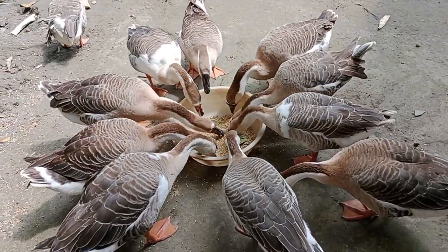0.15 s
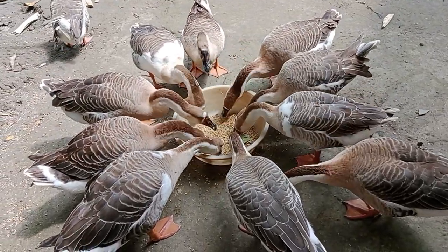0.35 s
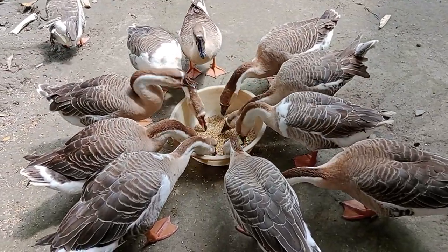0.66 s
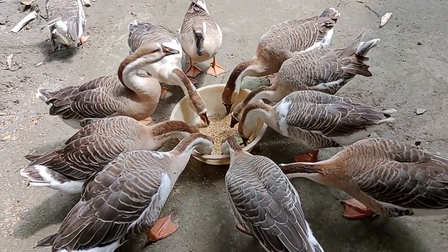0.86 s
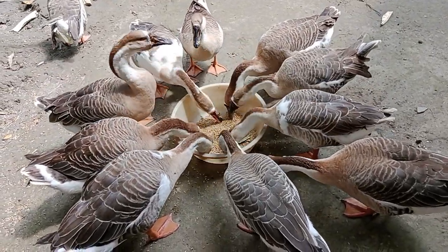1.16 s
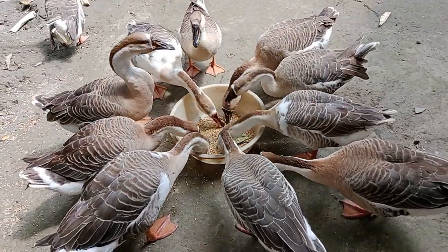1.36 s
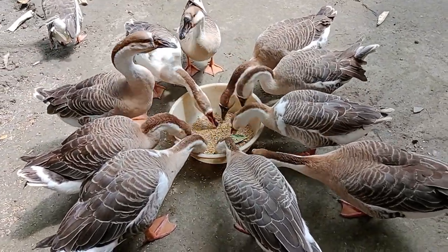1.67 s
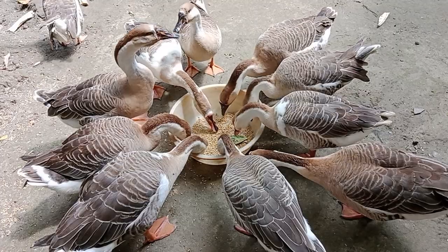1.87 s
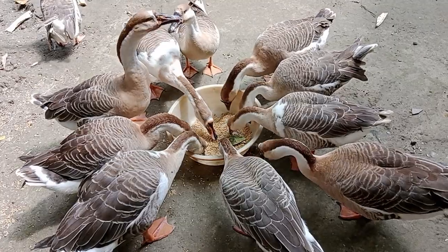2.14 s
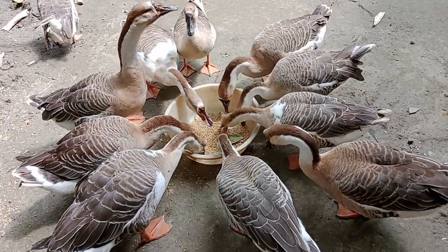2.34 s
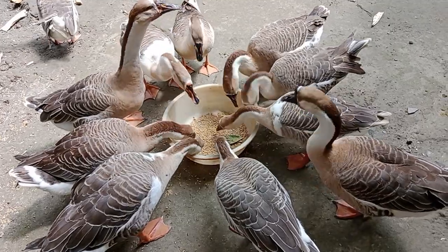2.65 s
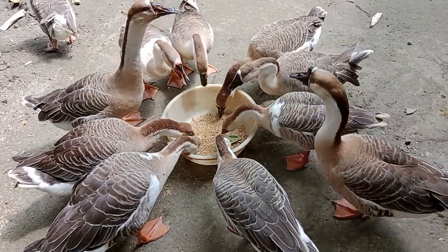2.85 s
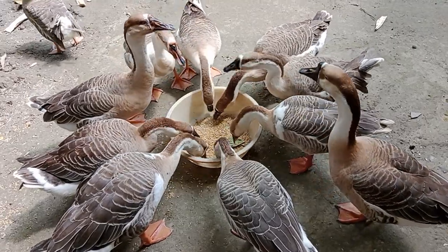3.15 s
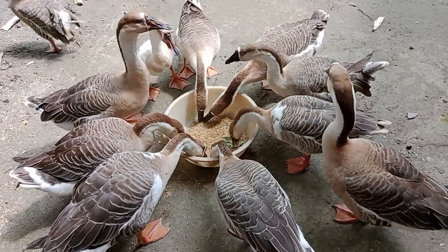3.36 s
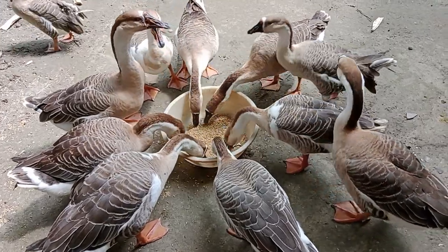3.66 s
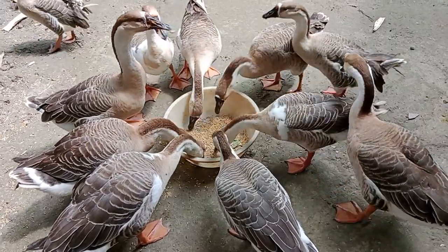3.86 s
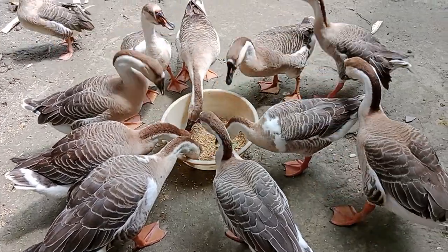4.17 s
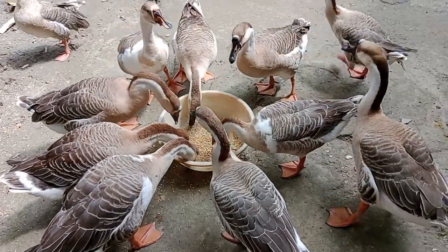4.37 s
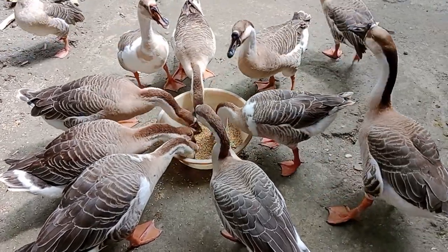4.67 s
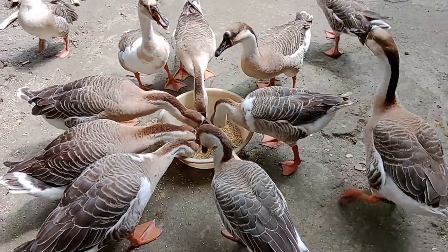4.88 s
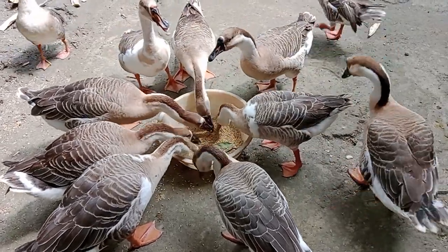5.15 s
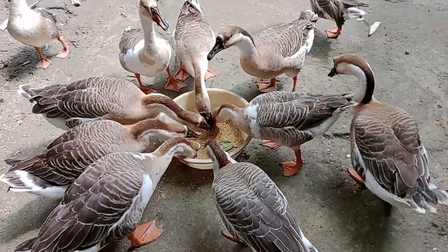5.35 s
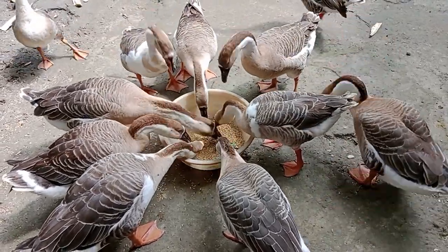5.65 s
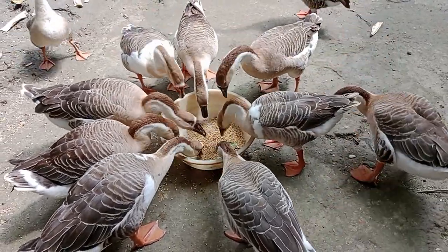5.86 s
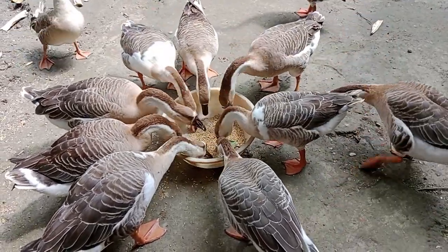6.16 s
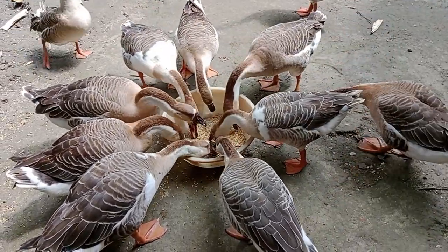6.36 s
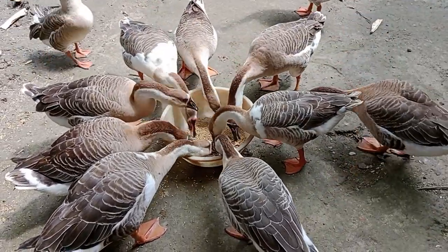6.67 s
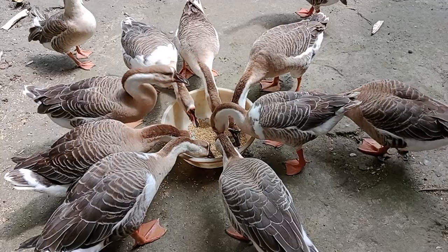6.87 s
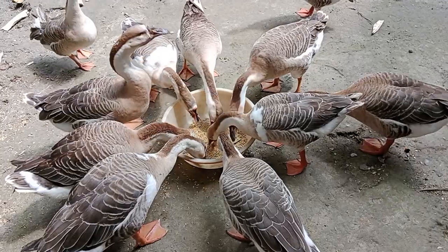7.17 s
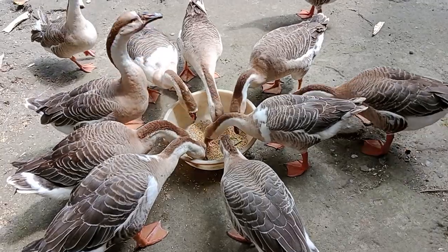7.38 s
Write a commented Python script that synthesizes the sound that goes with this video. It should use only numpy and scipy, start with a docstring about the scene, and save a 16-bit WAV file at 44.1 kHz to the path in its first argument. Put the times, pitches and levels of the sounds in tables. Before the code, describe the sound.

Several geese feed from a plastic bowl of grain. Irregular scooping rattles, clicks and hollow bill knocks come close by, strongest near the start, with a thin hiss of husks. Around three seconds a whistle runs into a loud hoarse honk; small murmurs follow, then busy knocking near five seconds and another soft whistle at six. Close microphone, quiet yard, hard floor, very short echo.

```python
"""A bill scoops through grain in a plastic bowl, a short rattling burst, and knocks hard on the bowl.
Geese keep feeding so in a hard-floored yard; soft whistles and murmurs join, and one runs into a hoarse honk.
Feeding: clacks and clicks driven by bill strokes, resonances of the bowl, and hissing husks as dense clicks.
Calls: harmonic tones that roughness turns into noisy throat resonances. Feeding and calls get a short echo.
Husks and a faint quiet-yard noise lie beneath."""
import sys
import numpy as np
from scipy import signal
from scipy.fft import rfft, irfft
from scipy.io import wavfile
from scipy.ndimage import uniform_filter1d

SR = 44100
rng = np.random.default_rng(int(sys.argv[2]) if len(sys.argv) > 2 else 0)


def digitize_waveform(pressure):
    """Quantize a signal to 16-bit integers and store it at the path in sys.argv[1].

    Rows of a 2-D input are taken as channels; values are limited to [-1, 1].
    """
    field = np.atleast_2d(pressure).T
    bounded = np.clip(field, -1, 1)
    quanta = np.round(bounded * 32767).astype(np.int16)
    wavfile.write(sys.argv[1], SR, quanta)


N = 331632
TIME = np.arange(N) / SR

# bills scooping grain: t/s, length/s, rattle level/dB, bowl thump level/dB
SCOOPS = [(0.025, 0.027, -44.5, -51), (0.191, 0.037, -47, -59.5), (0.377, 0.03, -45.5, -55.5),
          (0.585, 0.017, -38, -40.5), (1.124, 0.032, -45, -48), (1.185, 0.033, -47, -56),
          (1.257, 0.042, -52, -72), (1.303, 0.031, -48, -55), (1.573, 0.031, -48.5, -53),
          (1.986, 0.045, -44, -62.5), (2.208, 0.027, -45, -60), (2.347, 0.022, -46.5, -50),
          (2.468, 0.044, -48.5, -66.5), (2.599, 0.027, -48.5, -76), (3.338, 0.035, -41, -49.5),
          (3.449, 0.022, -39.5, -52), (3.756, 0.021, -38, -43.5), (3.905, 0.037, -46.5, -59.5),
          (4.768, 0.087, -47.5, -51.5), (4.864, 0.044, -39, -44.5), (4.947, 0.063, -45, -55.5),
          (5.157, 0.04, -48.5, -57), (5.304, 0.015, -43.5, -45.5), (5.615, 0.015, -47, -48.5),
          (5.717, 0.055, -50, -64.5), (6.992, 0.028, -48.5, -61), (7.135, 0.016, -52, -67),
          (7.258, 0.028, -44, -55), (7.351, 0.062, -45.5, -47.5), (7.503, 0.063, -41, -68.0)]
# light nibbles: t/s, rattle level/dB
NIBBLES = [(0.327, -53.5), (0.662, -53), (0.76, -61.5), (0.858, -52.5), (1.015, -59), (1.449, -62),
           (1.709, -60), (2.125, -56), (2.534, -52), (2.911, -53), (4.025, -57.5), (4.151, -62.5),
           (4.523, -61), (4.627, -59.5), (4.704, -55.5), (5.068, -51.5), (5.401, -56.5), (5.837, -51.5),
           (6.165, -61), (6.285, -53), (6.445, -53.5), (6.577, -54.5), (6.708, -53.5), (6.824, -54),
           (7.236, -50)]
# hard bill knocks: t/s, peak level/dB, ring f/Hz
KNOCKS = [(0.035, -39, 1200), (0.385, -41, 1770), (0.576, -39, 1090), (0.595, -28.5, 1300),
          (0.685, -40, 756), (0.82, -39.5, 884), (0.857, -45, 1360), (0.93, -43.5, 1200),
          (1.132, -31.5, 955), (1.174, -36.5, 1260), (1.996, -34, 1100), (3.772, -34.5, 700),
          (4.277, -31.5, 1075), (4.308, -42.5, 1060), (4.34, -47.5, 804), (4.782, -38, 770),
          (4.898, -33, 1600), (4.938, -33, 830), (5.085, -36.5, 1235), (5.571, -37.5, 1520),
          (5.63, -36.5, 770), (5.737, -38.5, 1650), (6.075, -39.5, 1110), (6.958, -41, 1090),
          (7.143, -41, 1340), (7.008, -36.5, 1210), (7.268, -37.5, 1170), (7.367, -34, 1270),
          (7.406, -38, 1320)]
# soft bumps, each ringing one low tone of the bowl: t/s, peak level/dB, f/Hz
BUMPS = [(0.589, -37, 286), (3.234, -54, 337), (3.908, -46, 520), (4.882, -42.5, 206), (6.199, -52, 472),
         (6.882, -59, 496), (7.237, -50, 293)]
# spectral outline of rattling grain, which also colours the knocks: f/Hz, level/dB
RATTLE_OUTLINE = [(100, -57.5), (330, -16.5), (750, -11.5), (1150, -5), (1600, -12.5), (2050, -9.5),
                  (3100, -20.5), (4300, -10.5), (4850, -33), (5500, -15.5), (7000, -22), (9000, -39.5)]
# modes of the bowl's wall and bottom: f/Hz, level/dB
BOWL_MODES = [(180, -13), (251.7, 1), (307.5, 3), (452.4, 4), (710, 0.5)]
# short goose calls, and one thin high tone at 5.384 s: loudest at t/s, swell/s, fade/s, pitch f/Hz, #
# glide/(octave/s), level/dB, roughness 0-1
SHORT_TONES = [(0.295, 0.036, 0.032, 1970, -5.5, -61, 0.54), (1.655, 0.12, 0.1, 961, -1.5, -52.5, 0.27),
               (1.975, .13, 0.32, 976, 0.7, -58, 0.29), (2.844, 0.022, 0.094, 1475, 4.5, -49.5, 0.57),
               (3.295, 0.011, 0.026, 1073, -4.5, -33, 0.31), (3.311, 0.013, 0.017, 1039, -0.5, -31, 0.47),
               (3.349, .03, 0.26, 1018, 1, -49, 0.65), (3.365, 0.044, 0.098, 689.5, 0.5, -48.5, .35),
               (3.641, 0.13, 0.14, 1070, 0.5, -49, 0.98), (3.735, 0.085, 0.12, 927, -0.6, -49.5, 0.23),
               (3.82, 0.059, 0.052, 1648, -4.5, -57.5, 0.31), (5.384, 0.011, 0.052, 2543, -0.8, -63, 0.15),
               (5.53, 0.073, 0.048, 1288, 1, -65.5, 0.2), (5.595, 0.051, 0.12, 1489, 3, -45.5, 0.76),
               (6.001, .03, 0.027, 1370, -1.3, -47, 0.12), (6.074, 0.013, 0.031, 936, 4, -52, 0.34),
               (6.209, 0.066, 0.019, 795, 3, -65, 0.17), (6.645, 0.17, .13, 632, -3, -64, 0.6),
               (7.308, 0.041, 0.071, 1620, -1.5, -59, 0.08)]
# two long whistles, one curve each: t/s, pitch f/Hz, level/dB
WHISTLES = [
    [(2.995, 1640, -64), (3.045, 1790, -60.5), (3.065, 1860, -47.5), (3.12, 1936, -43), (3.22, 1995, -43.5),
     (3.28, 1925, -40), (3.305, 1975, -44)],
    [(5.795, 1740, -65), (5.823, 1847, -51), (5.929, 1925, -51.5), (5.975, 1949, -37), (6.017, 1887, -39.5),
     (6.037, 1860, -65.5)],
]
# roughness 0-1 of each whistle, in even steps from its start to its end
WHISTLE_ROUGHNESS = [(.6, .08, .12, .55, .55, .5, .25), (.15, .15, .08, .08)]
# low calls are reedy, high ones nearly pure: pitch f/Hz, level step from one harmonic to the next/dB
REEDINESS = [(1070, 1.5), (1400, -17)]
# spectral outline of a goose's throat: f/Hz, level/dB
THROAT_OUTLINE = [(950, 12), (1900, 3.5), (2900, -13), (3900, -9), (4300, -17.5), (4800, -42), (5700, -22),
                  (7700, -6.5)]
# wavering throat resonances of the hoarse rasp: f/Hz, level/dB
RASP_RESONANCES = [(1014, -8), (1257, 2.5), (1428, 1.5), (2150, -12.5)]
# spectral outline of air rushing through the throat: f/Hz, level/dB
THROAT_AIR = [(300, -21.5), (1100, -5.5), (2300, -16.5), (5000, -44)]
# spectral outline of dry husks: f/Hz, level/dB
HUSK_OUTLINE = [(4900, -17), (7200, -13.5), (7900, 3), (10500, 4), (13600, -2.5), (15300, 4.5)]
# webbed feet planting on the floor: t/s, level/dB
STEPS = [(2.914, -63), (3.346, -55), (5.865, -60)]
# spectral outline of the quiet yard: f/Hz, level/dB
YARD_OUTLINE = [(25, -21), (100, -0.5), (200, -9), (1500, -11), (4500, -36)]

# usual centres of a scoop's rattle and thump; each spot lies within about half an octave of them
RATTLE_HZ, THUMP_HZ = 1358, 330
# each spot of the bowl favours a band of its own: how much, and how wide
SPOT_DB, SPOT_OCTAVES = 8, .3
# the bill bites a second time in each scoop: how much later and at what relative level
REBITE_S, REBITE_DB = 0.034, -18
# the bill brushes the grain this long before it bites; the shifting grain: time to its peak, its level
BRUSH_S, SHIFT_S, SHIFT_DB = .018, 0.035, -18
# every short call arches in pitch, and is weaker and hoarser at its two ends
ARCH_OCT_PER_S2, CALL_ENDS_DB, ENDS_ROUGH = 10, -30.5, 0.28
# above 1 a short call holds its level longer and stops more abruptly
CALL_HOLD = 1.17
# relative strength of the tones halfway between the harmonics, before roughness and reediness scale it
SUBTONE = .9
# a whistle's overtones grow with its level: how fast, and the level at which they would be at full strength
BRIGHTEN_DB_PER_DB, FULL_BRIGHT_DB = 0.76, -30


def scoops(nibble_s=0.038, nibble_thump_db=-10):
    """Repeated forced strokes: each scoop or faint nibble excites another spot of the bowl."""
    out = np.zeros(N)
    strokes = SCOOPS + [(s, nibble_s, db, db + nibble_thump_db) for s, db in NIBBLES]
    spots = 2 ** rng.uniform(-0.42, 0.52, (len(strokes), 2))
    for (s, length_s, rattle_db, thump_db), (high, low) in zip(strokes, spots):
        sound = scoop(length_s, rattle_db, RATTLE_HZ * high, thump_db, THUMP_HZ * low)
        add(out, s - BRUSH_S, sound)
    return out


def scoop(length_s, rattle_db, rattle_hz, thump_db, thump_hz, width_share=0.35):
    """Modal excitation: two bites and shifting grain drive both a rattle and the damped bowl modes."""
    bite = thrust(length_s)
    age = TIME[:len(bite)] / SHIFT_S
    forces = [undb(SHIFT_DB) * (age * np.exp(1 - age)) ** 2]
    for delay_s, db in [(BRUSH_S, 0), (BRUSH_S + REBITE_S, REBITE_DB)]:
        delayed = np.pad(bite, (int(delay_s * SR), 0))[:len(bite)]
        forces.append(undb(db) * delayed)
    push = np.linalg.norm(forces, axis=0)
    shove = push * clicks(len(push), rate=710, spread_db=4.0)
    wall = np.zeros(len(push))
    for hz, db in BOWL_MODES:
        mode = resonate_twice(shove, hz, width_share * hz)
        wall += undb(db) * spot_gain(hz, thump_hz) * mode
    thump = unit(wall) * rms(push)
    return rattle(push, rattle_hz) * undb(rattle_db) + thump * undb(thump_db)


def thrust(length_s, rise_s=0.0051):
    """Impulsive force: an exponential rise under a Gaussian decay."""
    t = TIME[:SR // 4]
    return (1 - np.exp(-t / rise_s)) * np.exp(-(t / length_s) ** 2)


def rattle(push, centre_hz, ring_s=0.0052, slide_oct_per_s=7, spread_db=3.0, count=160):
    """Granular impacts: kernels and bill edges ring as brief gliding tones over a dry crackle."""
    clacks, t = np.zeros(len(push)), TIME[:SR // 40]
    place, pitch = rng.random((count, 2)).T
    size, slide = rng.standard_normal((count, 2)).T
    starts = ((np.arange(count) + place) / count * len(push)).astype(int)
    pitches = 450 + 2250 * pitch
    for i, hz, db, glide in zip(starts, pitches, spread_db * size, slide_oct_per_s * slide):
        ring = sine(hz * 2 ** (glide * t)) * np.exp(-t / ring_s)
        add(clacks, i / SR, ring * push[i] * undb(db) * spot_gain(hz, centre_hz))
    crackle = push * clicks(len(push), rate=1300, spread_db=5.0)
    grain = unit(clacks) + .33 * unit(crackle)
    return unit(colour(grain, RATTLE_OUTLINE)) * rms(push)


def spot_gain(hz, centre_hz):
    """Position-dependent response: a Gaussian boost, in octaves, about the band a spot favours."""
    return undb(SPOT_DB * np.exp(-(np.log2(hz / centre_hz) / SPOT_OCTAVES) ** 2))


def knocks(lead_s=0.0045):
    """Discrete impacts: each contact starts just before its listed time."""
    out = np.zeros(N)
    for s, db, hz in KNOCKS:
        add(out, s - lead_s, knock(hz) * undb(db))
    return out


def knock(hz, ring_width_hz=210, soft_hz=2400, crack=0.086, overtone=1.68, overtone_db=-7):
    """Contact excitation: brief bill chatter rings a damped tone and its overtone; peak 1."""
    t = TIME[:SR // 20]
    contact_s = .0036
    contact = rng.standard_normal(len(t)) * (t / contact_s * np.exp(-t / contact_s)) ** 2
    # horn on plastic is a soft contact with little treble
    contact = signal.lfilter(*signal.butter(4, soft_hz, fs=SR), contact)
    ring = resonate(contact, hz, ring_width_hz)
    ring += undb(overtone_db) * resonate(contact, overtone * hz, 2 * ring_width_hz)
    sound = colour(ring + crack * contact, RATTLE_OUTLINE)
    return sound / np.abs(sound).max()


def taps(feeding, idle_db=-65, busy_db=8, spread_db=5, centre_hz=1150, octaves=0.76, count=110):
    """Random impacts whose strength follows the local feeding energy, each at its own pitch."""
    out = np.zeros(N)
    busy = np.sqrt(np.abs(uniform_filter1d(feeding ** 2, SR // 20)))
    for slot, (place, size, pitch) in enumerate(rng.uniform(-1, 1, (count, 3))):
        s = (slot + .5 + place / 2) / count * TIME[-1]
        peak = np.hypot(undb(idle_db), undb(busy_db) * busy[int(s * SR)]) * undb(spread_db * size)
        add(out, s, knock(centre_hz * 2 ** (octaves * pitch)) * peak)
    return out


def bumps(swell_s=0.0063, waver=0.146):
    """Single-mode response: a soft push swells into one low, unsteady tone that soon dies."""
    out, t, unsteady = np.zeros(N), TIME[:SR // 8], walk(rate=150)
    for s, db, hz in BUMPS:
        pitch = hz * (1 + waver * np.interp(s + t, TIME, unsteady))
        swell = t / swell_s * np.exp(1 - t / swell_s)
        add(out, s, undb(db) * swell * sine(pitch))
    return out


def snap(s=4.825, snap_db=-47, hz=5700, decay_s=0.0027):
    """Brittle fracture: one hard kernel cracks as a decaying burst of band-passed noise."""
    burst = (TIME > s) * np.exp(-np.abs(TIME - s) / decay_s)
    return burst * unit(resonate_twice(rng.standard_normal(N), hz, hz / 4)) * undb(snap_db)


def calls(jitter=0.069, shimmer=0.55, rasp_share=0.66, count=10):
    """Syrinx oscillation: a clean tone that, when rough, flutters, adds subtones and turns to rasp."""
    out = np.zeros(N)
    wobble, flutter, hoarse = walk(rate=380), walk(rate=200), rasp()
    # alternate strong and weak cycles put lines halfway between the harmonics
    orders = np.arange(2, count + 1) / 2
    for on, hz, db, rough, reed in call_shapes():
        t = TIME[on]
        rough = np.clip(rough, 0, 1)
        phase = 2 * np.pi * np.cumsum(hz * (1 + jitter * rough * wobble[on])) / SR
        tone = np.zeros(len(t))
        for k in orders:
            size = gain_at(THROAT_OUTLINE, k * hz) * reed ** (k - 1) / np.sqrt(k)
            if k % 1:
                size = size * SUBTONE * rough * reed ** 2
            tone += size * np.sin(k * phase)
        voice = np.sqrt(1 - rough ** 2) * unit(tone) + rasp_share * rough * hoarse[on]
        voice *= (1 + shimmer * rough * flutter[on]) / np.hypot(1, shimmer * rough)
        fade = np.clip(np.minimum(t - t[0], t[-1] - t) / 0.0041, 0, 1)
        out[on] += voice * fade * undb(db)
    return out


def call_shapes():
    """Source control: yield each call's samples, pitch, level, roughness and gain per harmonic."""
    for s, swell, fade, hz, glide, db, rough in SHORT_TONES:
        on = (TIME > s - swell) & (TIME < s + fade)
        t = TIME[on] - s
        slack = (t / np.where(t < 0, swell, fade)) ** 2  # 0 at full effort, 1 at the ends
        pitch = hz * 2 ** (glide * t - ARCH_OCT_PER_S2 * t ** 2)
        level = db + CALL_ENDS_DB * slack ** CALL_HOLD
        yield on, pitch, level, rough + ENDS_ROUGH * slack, gain_at(REEDINESS, hz)
    for whistle, rough in zip(WHISTLES, WHISTLE_ROUGHNESS):
        s, hz, db = np.transpose(whistle)
        on = (TIME > s[0]) & (TIME < s[-1])
        t = TIME[on]
        level = np.interp(t, s, db)
        roughness = np.interp(t, np.linspace(s[0], s[-1], len(rough)), rough)
        reed = undb(BRIGHTEN_DB_PER_DB * (level - FULL_BRIGHT_DB))
        yield on, np.interp(t, s, hz), level, roughness, reed


def rasp(wander=0.026, width_hz=60, air_db=-9):
    """Random modulation: throat resonances shake and drift in pitch over a little rushing air."""
    out = np.zeros(N)
    for hz, db in RASP_RESONANCES:
        pitch = hz * (1 + wander * walk(rate=27)) + width_hz * walk(rate=300)
        out += undb(db) * sine(pitch) * (1 + .5 * walk(rate=100))
    air = unit(colour(rng.standard_normal(N), THROAT_AIR))
    return unit(unit(out) + undb(air_db) * air)


def husks(feeding, stirred_db=-67, settle_db=-73.5, flicker_db=2, thin_db_per_s=-.5):
    """Dense random impacts: hiss follows the smoothed feeding energy over a trickle, slowly thinning."""
    keep = np.exp(-1 / (.008 * SR))  # 8 ms smoothing
    energy = signal.lfilter([1 - keep], [1, -keep], feeding ** 2)
    stir = unit(np.sqrt(energy)) ** .4  # compressed, so faint stirring counts too
    hiss = unit(colour(clicks(N, rate=4000, spread_db=2.5), HUSK_OUTLINE))
    level = np.hypot(undb(stirred_db) * stir, undb(settle_db))
    return hiss * level * undb(flicker_db * walk(rate=150) + thin_db_per_s * TIME)


def steps(hz=115, length_s=0.035):
    """Damped impact: a soft foot lands with a dull pat of low band-passed noise."""
    out, push = np.zeros(N), thrust(length_s)
    for s, db in STEPS:
        pat = resonate_twice(rng.standard_normal(len(push)), hz, hz)
        add(out, s, unit(pat) * push * undb(db))
    return out


def yard_air(level_db=-83.5, drift_db=2):
    """Broadband background: faint coloured noise whose level drifts slowly."""
    return unit(colour(rng.standard_normal(N), YARD_OUTLINE)) * undb(level_db + drift_db * walk(rate=2))


def yard_echo(x, wet_db, t60_s):
    """Reverberation: the hard floor and nearby walls return a short, exponentially decaying tail."""
    t = TIME[:SR // 2]
    tail = rng.standard_normal(len(t)) * np.exp(-np.log(1000) * t / t60_s) * (t > .006)
    return x + undb(wet_db) * signal.fftconvolve(x, tail / np.linalg.norm(tail))[:N]


def clicks(count, rate, spread_db):
    """Poisson process: random clicks of uneven size and sign, rate a second."""
    out = np.zeros(count)
    wait, sign, size = rng.random((count // 3, 3)).T
    at = np.cumsum(-np.log(1 - wait) * SR / rate).astype(int)
    on = at < count
    # a few clicks are much harder than the rest
    out[at[on]] = np.sign(sign[on] - .5) * undb(-spread_db * np.log(1 - size[on]) / 2)
    return out


def walk(rate):
    """Smoothed random steps: a fluctuation of rms 1 that changes rate times a second."""
    k = max(int(SR / rate), 1)
    held = np.repeat(rng.standard_normal(N)[:N // k + 1], k)
    return unit(uniform_filter1d(held, k)[:N])


def sine(hz):
    """Phase accumulation: a sine whose frequency follows hz."""
    return np.sin(2 * np.pi * np.cumsum(hz) / SR)


def resonate(x, hz, width_hz):
    """Two-pole resonance of unit gain at its centre."""
    radius = np.exp(-np.pi * width_hz / SR)
    poles = [1, -2 * radius * np.cos(2 * np.pi * hz / SR), radius ** 2]
    return signal.lfilter([1, 0, -1], poles, x) * (1 - radius ** 2) / 2


def resonate_twice(x, hz, width_hz):
    """Cascaded resonance: two in series give steeper skirts."""
    return resonate(resonate(x, hz, width_hz), hz, width_hz)


def colour(x, points, size=2048):
    """Minimum-phase filtering: a causal filter with the given outline, built from its cepstrum."""
    cepstrum = irfft(np.log(gain_at(points, np.arange(size // 2 + 1) * SR / size)))
    cepstrum[1:size // 2] *= 2
    cepstrum[size // 2 + 1:] = 0
    return signal.fftconvolve(x, irfft(np.exp(rfft(cepstrum))))[:len(x)]


def gain_at(points, hz):
    """Spectral envelope: gain of an outline, with dB interpolated over log frequency."""
    f, db = np.transpose(points)
    return undb(np.interp(np.log(hz + 1), np.log(f), db))


def undb(db):
    """Decibel law: level to amplitude gain."""
    return 10 ** (np.asarray(db) / 20)


def rms(x):
    """Effective value: root of the mean square."""
    return np.sqrt(np.mean(x ** 2))


def unit(x):
    """Normalization: scale to rms 1."""
    return x / np.sqrt(np.mean(x ** 2) + 1e-30)


def add(track, s, sound):
    """Superposition: mix a sound into the track at s seconds."""
    i = max(int(s * SR), 0)
    track[i:i + len(sound)] += sound[:max(len(track) - i, 0)]


def scene():
    """Superposition of feeding and calling geese, with echo, over husks and a quiet yard."""
    grain = scoops()
    feeding = grain + taps(grain) + knocks() + bumps() + snap() + steps()
    geese = yard_echo(feeding, wet_db=-8.0, t60_s=0.082) + yard_echo(calls(), wet_db=-4.0, t60_s=0.13)
    return (geese + husks(feeding) + yard_air())[None]


def record(dry, low_hz=45, top_hz=15850):
    """Band limiting: a high-pass cuts the deep bass and a steep low-pass cuts the top."""
    lean = signal.sosfilt(signal.butter(2, low_hz, "high", fs=SR, output="sos"), dry)
    return signal.sosfilt(signal.ellip(10, .2, 70, top_hz, fs=SR, output="sos"), lean)


dry = scene()
out = record(dry)
digitize_waveform(out)
```